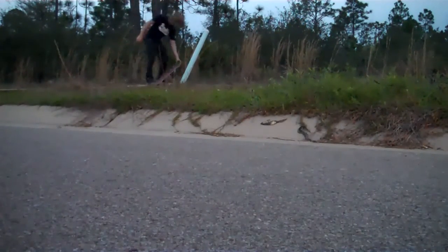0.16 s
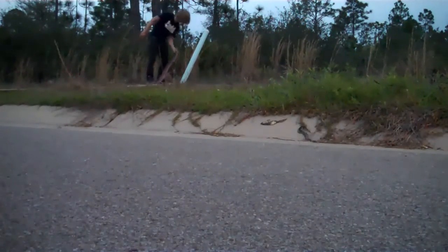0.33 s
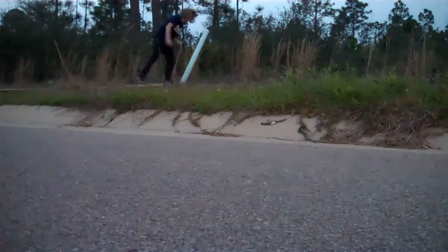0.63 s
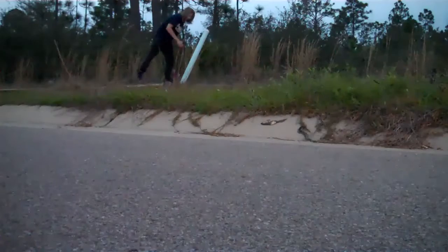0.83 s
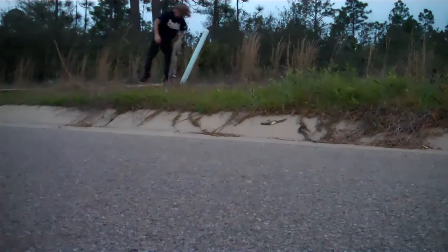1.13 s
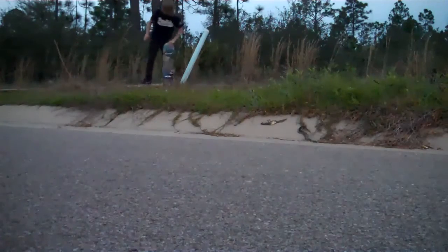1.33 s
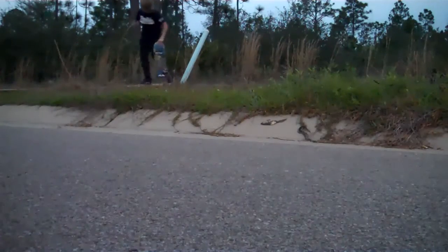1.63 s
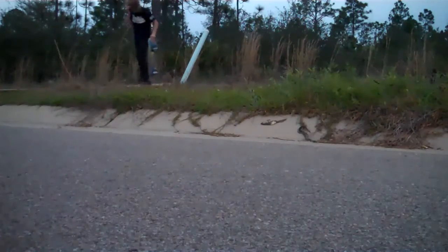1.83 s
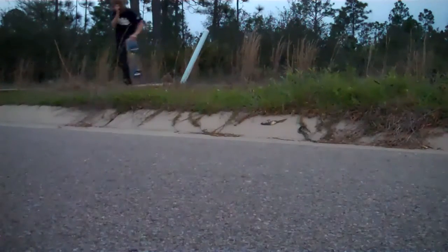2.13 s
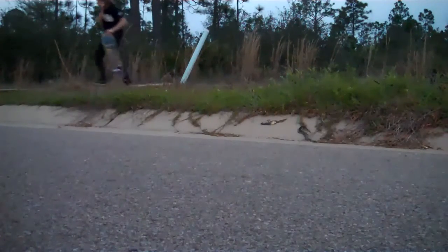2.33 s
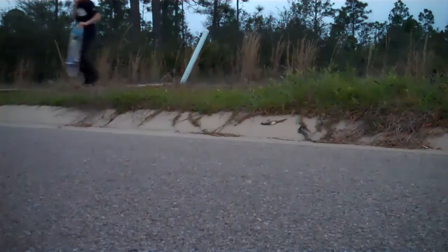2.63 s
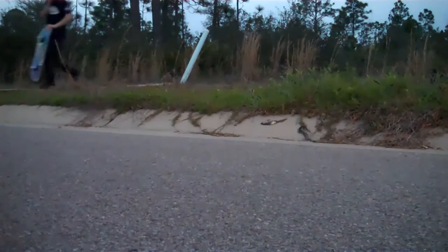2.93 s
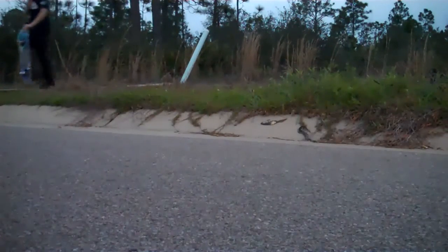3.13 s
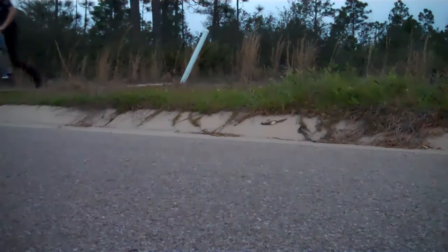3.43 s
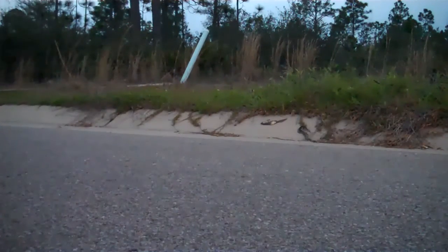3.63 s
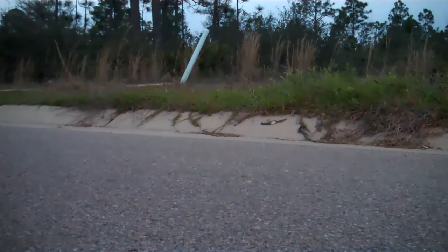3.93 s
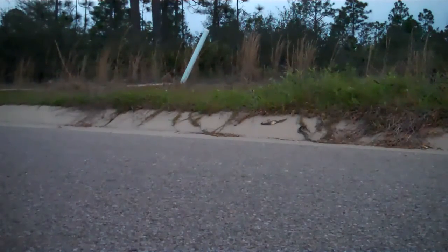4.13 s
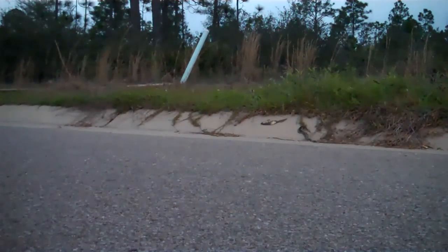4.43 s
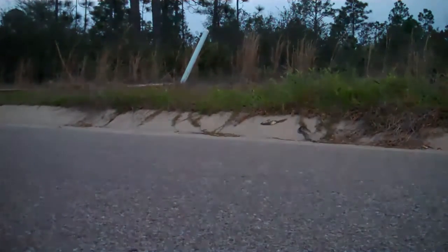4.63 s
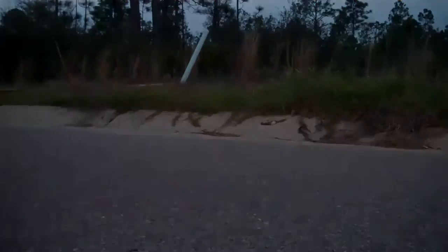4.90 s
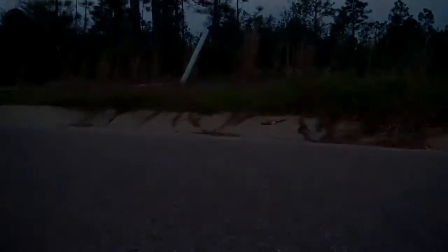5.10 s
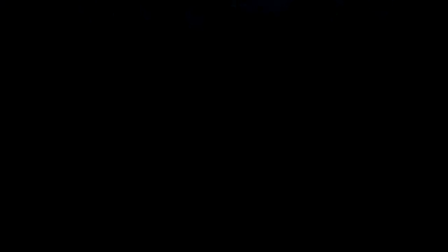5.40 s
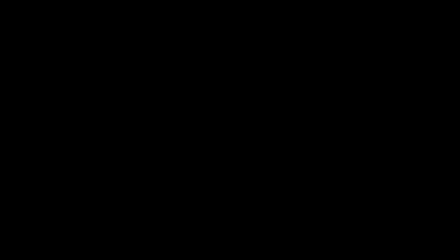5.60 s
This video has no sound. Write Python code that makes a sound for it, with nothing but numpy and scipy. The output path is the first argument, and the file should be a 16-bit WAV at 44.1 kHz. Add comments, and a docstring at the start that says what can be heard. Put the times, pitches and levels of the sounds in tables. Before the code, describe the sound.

Close by at a quiet roadside, shoes scrape grit and a wooden skateboard knocks lightly as it is picked up. Footfalls thud softly, a truck squeaks briefly, duller knocks gather, then the board hits the pavement with one loud, sharp clack. Stones tick and small rattles follow over faint outdoor hush. Stereo microphones catch a soft echo from trees; everything fades to silence.

```python
"""Shoes scuff on grit and a wooden deck knocks: a skater lifts a board at a gritty roadside pad, close by.
The skater goes off to the left and drops the board on the pavement; footfalls thud, stones tick, a truck squeaks.
Blows ring the deck's modes and hardware noise, scrapes are showers of grains, the squeak is wavering metal modes.
Pavement smears the sound and the tree line throws back a soft echo, into two microphones.
Beneath lie faint trills and an outdoor hush with thin hum and whine; all fades over about the last second."""
import sys
import numpy as np
from scipy import signal
from scipy.fft import rfft, irfft, next_fast_len
from scipy.io import wavfile
from scipy.ndimage import map_coordinates

SR = 44100
rng = np.random.default_rng(int(sys.argv[2]) if len(sys.argv) > 2 else 0)


def unload_wav(signal):
    """Save mono or channel-first audio to the path in sys.argv[1] as 16-bit WAV at rate SR, clipped to [-1, 1]."""
    wavfile.write(
        sys.argv[1],
        SR,
        np.round(np.clip(np.atleast_2d(signal).T, -1, 1) * 32767).astype(np.int16),
    )


N = 253912
TIME = np.arange(N) / SR


def amp(db):
    """Decibels to gain."""
    return 10 ** (np.asarray(db) / 20)


def evened(x):
    """Scales to rms 1."""
    return x / np.sqrt(np.mean(x ** 2) + 1e-20)


def read(points, hz):
    """A spectrum's value, joined by straight lines on a log-frequency axis."""
    f, value = np.transpose(points)
    return np.interp(np.log(hz + 1), np.log(f + 1), value)


def add(mix, s, sound):
    """Lays a sound into the mix at time s."""
    part = mix[max(round(s * SR), 0):][:len(sound)]
    part += sound[:len(part)]


def causal(points, size=2048):
    """The sharp-fronted (minimum-phase) impulse response that has a given spectrum in dB."""
    log_gain = np.log(amp(read(points, abs(np.fft.fftfreq(size, 1 / SR)))))
    return np.fft.ifft(np.exp(np.conj(signal.hilbert(log_gain)))).real[:size // 2]


def tint(x, points):
    """Passes a sound through a spectrum."""
    return signal.oaconvolve(x, causal(points))[:len(x)]


def drift(rate_hz):
    """Slow chance of rms 1: random points, two per cycle of the rate, joined by straight lines."""
    return evened(np.interp(2 * rate_hz * TIME, np.arange(5000), rng.standard_normal(5000)))


def notes(rows, rise_s, fall_s):
    """Level of a row of notes that each rise, hold and die away."""
    level = 0
    for start, length, db in rows:
        rise = np.clip((TIME - start) / rise_s, 0, 1)
        fall = np.exp(-np.maximum(TIME - start - length, 0) / fall_s)
        level = level + amp(db) * rise * fall
    return level


# Blows on the deck, close by. Each row: start in seconds, level in dB, brightness (low-pass corner) in Hz,
# ring length as a factor on the modes' t60.
BLOWS = [(0.315, -46.5, 1000, 0.83), (0.689, -50, 1620, 0.24), (1.378, -50, 1280, 1.2),
         (1.835, -40.5, 1400, 0.34), (1.847, -44, 1660, 1.2), (2.598, -47, 900, 0.2),
         (2.980, -47, 1180, .17), (3.4707, -38, 800, 0.61), (3.496, -38, 780, 1.27),
         (3.567, -33.5, 833, 0.6), (3.753, -46, 994, 0.074), (3.937, -45, 750, 0.2),
         (3.976, -40.5, 790, 0.61), (4.145, -53, 1000, 0.064), (4.3535, -19.5, 1800, 0.29),
         (4.3577, -16, 1700, 0.04), (4.3579, -23, 848, 1.1), (4.3592, -20, 5000, 0.65),
         (4.363, -24, 3506, 0.37), (4.3743, -27, 1200, .11), (4.3858, -26.5, 4020, 0.34),
         (4.577, -49.5, 1400, 0.26), (4.715, -40, 950, 0.11), (4.829, -43, 2800, 1.2),
         (5.123, -44, 1410, 0.49)]
# Ringing of the deck with its trucks. Each row: pitch in Hz, level in dB, t60 in seconds at ring length 1.
DECK_MODES = [(174.5, -10.5, 0.49), (211.5, -9, 0.24), (282, -9, 0.22), (458, -12.5, .26), (493, 1, 0.074),
              (540.5, -4.5, 0.12), (688, 0, 0.09), (765, 1.5, 0.07), (807, -1.5, 0.066), (864, -5, 0.079),
              (952, -4, 0.082), (1017, -11, 0.07), (1108, -3.5, .09), (1286, -8, 0.055),
              (1394, -18.5, 0.12), (1516, -24, .1), (2252, -5.5, 0.07), (2449, -3.5, 0.066),
              (2660, -3.5, 0.046), (2860, -3, 0.061), (3244, -1, 0.05)]
# Dense rattle of wheels and hardware in each blow. Each row: frequency in Hz, level in dB.
RATTLE_COLOUR = [(30, -30), (90, -38), (170, -7.5), (370, -16.5), (500, 7), (900, -7.5), (1300, -6),
                 (1900, -18.5), (3000, -7), (4300, -10), (8000, -22), (14000, -33.5)]
# High-pass corner of a blow of 1 kHz brightness, and the power by which it follows hardness:
# harder, shorter contacts move less bass.
LOW_HZ, LOW_FOLLOWS = 376, 0.77
# Until the second wheel lands: rocking after a blow of 1 kHz brightness (sooner if harder), or landing flat.
ROCK_S, FLAT_S = .0018, 0.00013
# The board rocks if it rings longer than this factor and is struck more softly than this.
LOOSE_RING, SLAM_DB = .6, -30


def knocks(rattle_db=-10, rattle_t60=0.19, mode_db=0, build_s=0.0012, second_db=-2, size=14000, count=220):
    """Each blow rings deck and hardware; soft contact is duller, hard contact thinner, a grip damps the ring."""
    out = np.zeros(N)
    t = np.arange(size, dtype=np.float32) / SR
    hz, level, t60 = np.transpose(DECK_MODES).astype(np.float32)[:, :, None]
    # bending waves take a moment to fill the deck
    waves = amp(level) * np.sin(2 * np.pi * hz * t) * (1 - np.exp(-t / build_s))
    noise = rng.standard_normal(len(BLOWS) * size)
    rattles = evened(tint(noise, RATTLE_COLOUR)).reshape(-1, size)
    for (s, db, bright_hz, free), rattle in zip(BLOWS, rattles):
        hardness = bright_hz / 1000
        low_hz = LOW_HZ * hardness ** LOW_FOLLOWS
        rocks = free > LOOSE_RING and db < SLAM_DB
        gap = ROCK_S / hardness if rocks else FLAT_S
        fall = -np.log(1000) * t[:int(size * min(free, 1))] / free
        modes = (waves[:, :len(fall)] * np.exp(fall / t60)).sum(0)
        ring = amp(mode_db) * modes / np.std(modes[:count])  # levelled on its first samples
        ring = ring + amp(rattle_db) * rattle[:len(fall)] * np.exp(fall / rattle_t60)
        ring = signal.lfilter(*signal.butter(2, min(bright_hz, SR / 3), fs=SR), ring)
        ring = signal.lfilter(*signal.butter(2, low_hz, "highpass", fs=SR), ring)
        add(out, s, amp(db) * ring)
        add(out, s + gap, amp(db + second_db) * ring)  # second contact feeds some modes and cancels others
    return out


# Footfalls beside the board. Each row: start in seconds, level in dB, pitch in Hz, swell to the peak in seconds.
FOOTFALLS = [(0.713, -42, 179, 0.0026), (0.726, -43.5, 330, 0.001), (1.518, -49.5, 315, 0.0023),
             (2.631, -45.5, 194, .003), (3.506, -45.5, 180, 0.014), (3.577, -45, 220, 0.0053),
             (3.976, -50.5, 200, 0.0056), (4.058, -56.5, 284.6, .015)]


def steps(crunch_db=-10, crunch_s=.012, size=7000):
    """A heel pushes the ground: a few low cycles that swell and die, and the dull crunch of the soil."""
    out, t = np.zeros(N), np.arange(size) / SR
    for s, db, hz, swell in FOOTFALLS:
        push = t / swell * np.exp(1 - t / swell) * np.sin(2 * np.pi * hz * t)
        band = signal.butter(2, [hz / 2, 2 * hz], "bandpass", fs=SR)
        soil = signal.lfilter(*band, rng.standard_normal(size))
        crunch = amp(crunch_db) * evened(soil) * np.exp(-t / crunch_s)
        add(out, s, amp(db) * (push + crunch))
    return out


# Soles and deck scraping on grit. Each row: peak time in seconds, fall time constant in seconds,
# rasp in dB, body in dB over the rasp, sizzle in dB over the rasp.
SCRAPES = [(0.186, 0.024, -55.5, 7, -1.5), (0.208, 0.012, -67, 23, 10), (0.3175, 0.0055, -38.5, -4.5, -6),
           (0.394, 0.0084, -61, 7.5, 3), (0.906, 0.0079, -48.5, 2.5, 3.5), (1.377, 0.01, -60.5, 10, 9),
           (1.836, 0.0066, -46, 10, 11), (1.850, 0.015, -48.5, 10.5, 7), (1.887, 0.02, -56.5, 6.5, 3.5),
           (1.979, 0.013, -74, 11, -8), (2.827, 0.013, -62.5, 9, 3), (2.988, 0.019, -57, 7, 10),
           (3.271, 0.019, -60, -5, 5.5), (3.510, 0.022, -45.5, -0.5, -12), (3.577, 0.015, -50.5, -21, -5),
           (3.972, .022, -49, 1, -8.5), (4.248, 0.049, -61.5, -16, 11), (4.323, 0.0036, -47.5, -19, -1.5),
           (4.345, 0.028, -50, -9, 8.5), (4.359, 0.008, -29.5, 7, -10), (4.386, 0.0086, -34, 3.5, -6.5),
           (4.492, 0.013, -58, 12.5, -12.5), (4.658, 0.025, -49, -6, -15.5), (4.736, 0.026, -59, 7, -13),
           (4.826, 0.011, -35, -16.5, -6.5), (4.912, 0.014, -51.5, -1, -10), (5.078, 0.0081, -52, 4, 4.5),
           (5.101, 0.014, -52.5, 4, -20), (5.256, .004, -45, -2, -5.5), (5.385, 0.015, -53, 4, 4),
           (5.457, 0.015, -54.5, 10.5, 1.5)]
# Colours of a scrape, low, middle and high. Each row: frequency in Hz, level in dB.
BODY_COLOUR = [(60, -42), (200, -8), (450, 2), (800, 1.5), (1250, 1), (1900, -11.5), (3500, -28),
               (8000, -56)]
RASP_COLOUR = [(500, -22), (1500, 5), (2300, 1.5), (3400, 4.5), (5000, -1.5), (6000, 4), (7500, 6.5),
               (11000, -32), (15000, -24)]
SIZZLE_COLOUR = [(2500, -40), (5000, -3.5), (6700, 6), (8500, 4), (10500, -9), (14000, -16)]
SCUFF_RISE = 0.5  # time scale of a stroke's build-up, as a share of its fall time


def scuffs(grain_db=4.0, grains_per_s=7000):
    """Sand grains break in quick succession under each short stroke."""
    force = np.zeros((3, N))
    for s, fall, rasp_db, body_db, sizzle_db in SCRAPES:
        rise = SCUFF_RISE * fall
        t = np.arange(-3 * rise, 8 * fall, 1 / SR)
        stroke = np.exp(np.where(t < 0, -(t / rise) ** 2, -t / fall))
        for band, db in zip(force, (body_db, 0, sizzle_db)):
            add(band, s + t[0], amp(rasp_db + db) * stroke)
    sizes = amp(grain_db * np.minimum(rng.exponential(1, N), 4)) * rng.choice([-1, 1], N)
    out = np.zeros(N)
    for band, colour in zip(force, (BODY_COLOUR, RASP_COLOUR, SIZZLE_COLOUR)):
        grains = evened(sizes * (rng.random(N) < grains_per_s / SR))
        out += tint(grains * band, colour) / np.linalg.norm(causal(colour))
    return out


# Stones snapping under the wheels and shoes. Each row: start in seconds, level in dB.
STONES = [(0.3147, -37.5), (1.8697, -44), (3.5042, -34), (4.362, -24.5), (4.384, -29), (4.530, -46),
          (4.613, -36.5), (4.6313, -30), (4.647, -41), (4.661, -28.5), (4.6807, -35.5)]
# Colour of a snap. Each row: frequency in Hz, level in dB.
STONE_COLOUR = [(300, -37.5), (1200, -17), (2500, 0), (4000, -3), (6000, 5), (8000, 6), (10000, -10.5),
                (15000, -14.5)]


def ticks(snap_s=0.00061, tail_db=-15, tail_s=0.0033, size=1500):
    """A stone gives a hard snap with a short gritty tail."""
    out, t = np.zeros(N), np.arange(size) / SR
    for s, db in STONES:
        fall = 2 * np.exp(-t / snap_s) + amp(tail_db) * np.exp(-t / tail_s)
        add(out, s, amp(db) * rng.choice([-1, 1], size) * fall)
    return tint(out, STONE_COLOUR) / np.linalg.norm(causal(STONE_COLOUR))


# Slips of a dry truck as the board swings. Each row: start in seconds, length in seconds, level in dB.
TRUCK_SLIPS = [(2.76, 0.032, -44), (2.797, .008, -43), (2.818, 0.015, -44.5), (2.88, .075, -56.5)]
# Modes of the rubbing metal. Each row: pitch in Hz, level in dB.
TRUCK_MODES = [(5940, -19), (7935, -4.5), (9255, -20), (9500, -27)]
SQUEAK_RISE_S, SQUEAK_FALL_S = 0.0074, 0.0059


def squeak(waver=0.0059):
    """Rubbing metal sings on a few high, slightly wavering modes."""
    turns = np.cumsum(1 + waver * drift(75)) / SR
    level = notes(TRUCK_SLIPS, SQUEAK_RISE_S, SQUEAK_FALL_S)
    return level * sum(amp(db) * np.sin(2 * np.pi * hz * turns) for hz, db in TRUCK_MODES)


# Grit and pavement scatter the treble. Each row: frequency in Hz, level in dB.
GROUND_SCATTER = [(200, -22.5), (1200, -19), (2800, -15.5), (5000, -4.5), (8000, -16), (14000, -2)]


def pavement(x, fall_s=0.0043, size=1024):
    """The rough ground smears each sound by a few milliseconds, differently for each microphone."""
    taps = rng.standard_normal((2, size)) * np.exp(-np.arange(size) / SR / fall_s)
    smears = [tint(tap / np.linalg.norm(tap), GROUND_SCATTER) for tap in taps]
    return np.array([signal.oaconvolve(x, smear)[:N] for smear in smears])


# Scatter from the near brush, then from the edge of the wood farther off.
# Each row: delay in seconds, rise in seconds, level in dB relative to the other, t60 in seconds.
TREE_ECHOES = [(.014, 0.014, 5, 0.64), (.1, .028, 0, .7)]
# Colour of the echo. Each row: frequency in Hz, level in dB.
TREE_COLOUR = [(80, -15.5), (180, 9), (330, 1.5), (600, -9.5), (1100, -3), (1600, 10), (2600, -2),
               (5000, 0), (12000, -8.5)]


def trees(x, echo_db=-21, spread=0.25, size=40000):
    """Trunks and brush scatter the sound back as two noisy tails, partly different at each microphone."""
    t = np.arange(size) / SR
    shape = np.zeros(size)
    for delay, rise, db, t60 in TREE_ECHOES:
        fall = np.exp(-np.log(1000) * (t - delay) / t60)
        shape += amp(db) * np.clip((t - delay) / rise, 0, 1) * fall
    mid, side = rng.standard_normal((2, size)) * shape / np.linalg.norm(shape)
    tails = [tint(mid + sign * spread * side, TREE_COLOUR) for sign in (1, -1)]
    return amp(echo_db) * np.array([signal.oaconvolve(x, tail)[:N] for tail in tails])


# Faint far trills in the brush. Each row: start in seconds, length in seconds, level in dB.
FAR_TRILLS = [(2.6, 0.29, -70.5), (3.18, .2, -69.5), (3.94, 0.081, -66)]
TRILL_RISE_S, TRILL_FALL_S = 0.022, .04


def trill(centre_hz=3480, width_hz=300):
    """A fuzzy high note: sine and cosine at one pitch, each with its own fast random level."""
    sine = drift(width_hz) * np.sin(2 * np.pi * centre_hz * TIME)
    cosine = drift(width_hz) * np.cos(2 * np.pi * centre_hz * TIME)
    return (sine + cosine) * notes(FAR_TRILLS, TRILL_RISE_S, TRILL_FALL_S)


# Colour of the distant air. Each row: frequency in Hz, relative level in dB per Hz.
AIR_COLOUR = [(25, -13.5), (60, -7), (90, -4.5), (125, -3), (250, 0), (400, -1.5), (1300, -3), (2000, -5.5),
              (2800, -7), (4500, -11), (6700, -10.5), (7800, -8.5), (8800, -17.5), (10000, -16.5),
              (14000, -16.5)]
# Likeness of the air at the two microphones. Each row: frequency in Hz, left-right correlation.
AIR_LIKENESS = [(25, 0.058), (100, 0.99), (500, 0.51), (1200, 0.59), (2500, 0), (5000, 0), (14000, 0.81)]
# Thin hum and whine. Each row: centre pitch in Hz, typical level in dB.
HUM_AND_WHINE = [(119, -75.5), (239, -74), (1890, -75)]
HUSH_DB = -57.5


def hush(swell_db=-0.41, flicker_db=0.82, whine_waver_hz=1.8, whine_waver_db=2):
    """Distant air as shaped noise, its left-right likeness set by pitch, with faintly wavering tones."""
    size = next_fast_len(N, True)
    hz = np.fft.rfftfreq(size, 1 / SR)
    a, b = rfft(rng.standard_normal((2, size)))
    same = np.clip(read(AIR_LIKENESS, hz), -1, 1)
    pair = np.array([a, same * a + np.sqrt(1 - same ** 2) * b])
    air = evened(irfft(pair * amp(read(AIR_COLOUR, hz)), size)[:, :N])
    tones = np.zeros(N)
    for f, db in HUM_AND_WHINE:
        level = amp(db + whine_waver_db * drift(4.6)) * np.sqrt(2)  # a sine of rms 1 peaks at root 2
        turns = np.cumsum(f + whine_waver_hz * drift(8.2)) / SR
        tones += level * np.sin(2 * np.pi * turns)
    return air * amp(HUSH_DB + swell_db * drift(0.41) + flicker_db * drift(25)) + tones


# How much later the right microphone hears the skater. Each row: time in seconds, lag in microseconds.
RIGHT_LAG = [(0, 1.1), (1.9, 1), (3, 4.6), (3.5, 33), (4.4, 40)]


def scene():
    """The skater moves left, so the direct sound comes to reach the right microphone later."""
    near = knocks() + steps() + scuffs() + ticks() + squeak()
    lag = np.interp(TIME, *np.transpose(RIGHT_LAG)) * SR / 1e6  # in samples
    right = map_coordinates(near, [np.arange(N) - lag], order=3)
    return np.array([near, right]) + pavement(near) + trees(near) + hush() + trill()


# Colour of the two microphones. Each row: frequency in Hz, left in dB, right in dB.
MIC_COLOURS = [(1500, 0, 0), (2800, .5, -1), (5000, 0, 0), (6600, 0, 0), (7900, 5, -3), (9200, 4.5, -8),
               (11000, 2, -9), (14000, 0, -7)]
FADE_AT, FADE_S = 5.687, 1.0  # moment of silence, and length of the straight fade into it, in seconds
EDGE_HZ = 14500  # upper band limit


def record(dry):
    """Each microphone's colour, a straight fade to silence that just begins to reopen, then the band limit."""
    mics = np.array(MIC_COLOURS)
    heard = np.array([tint(dry[0], mics[:, [0, 1]]), tint(dry[1], mics[:, [0, 2]])])
    fade = np.minimum(abs(TIME - FADE_AT) / FADE_S, 1)
    low_pass = signal.firwin(255, EDGE_HZ, window=("kaiser", 8), fs=SR)
    return signal.oaconvolve(heard * fade, low_pass[None], "same")


dry = scene()
out = record(dry)
unload_wav(out)
```